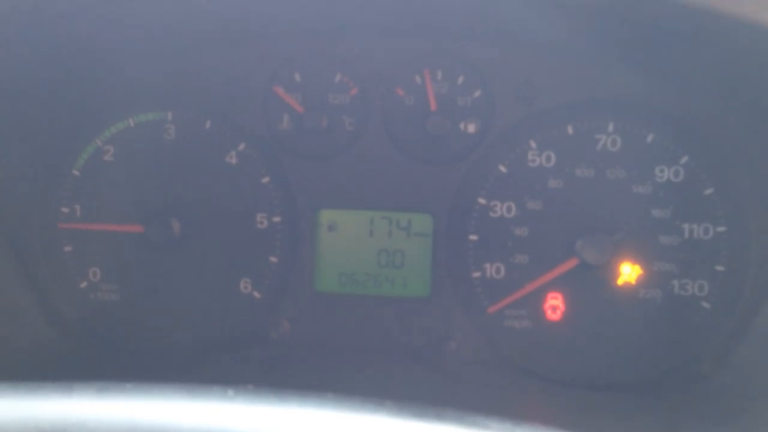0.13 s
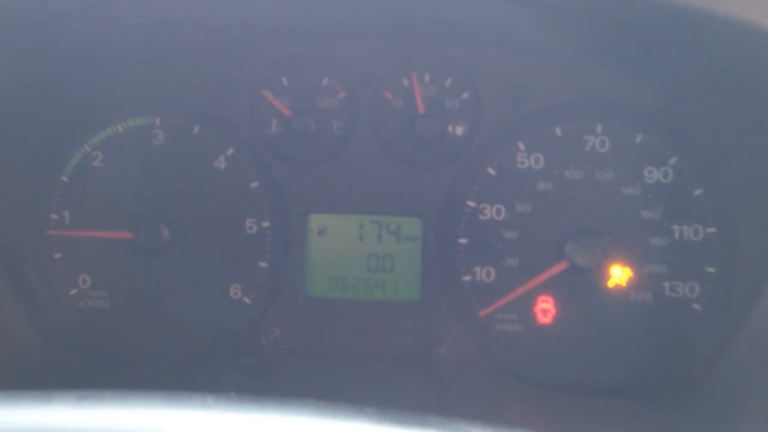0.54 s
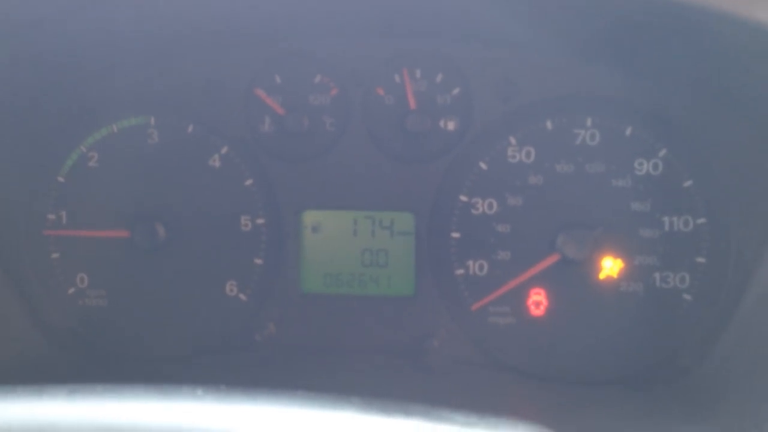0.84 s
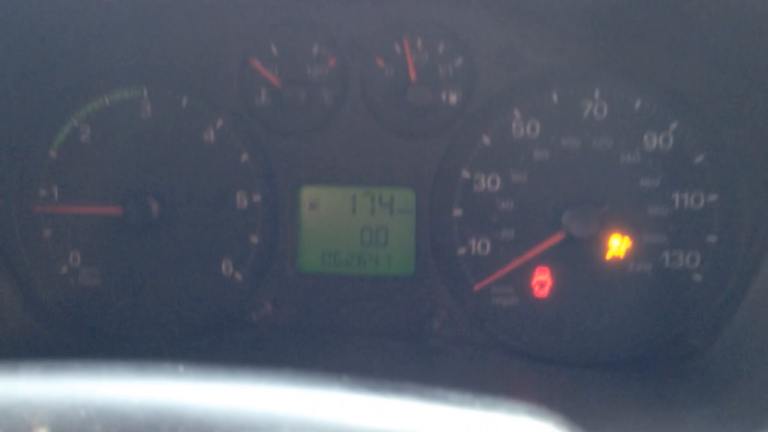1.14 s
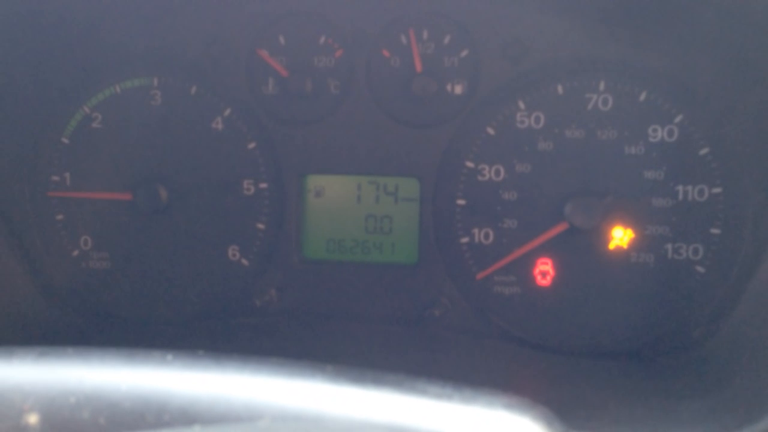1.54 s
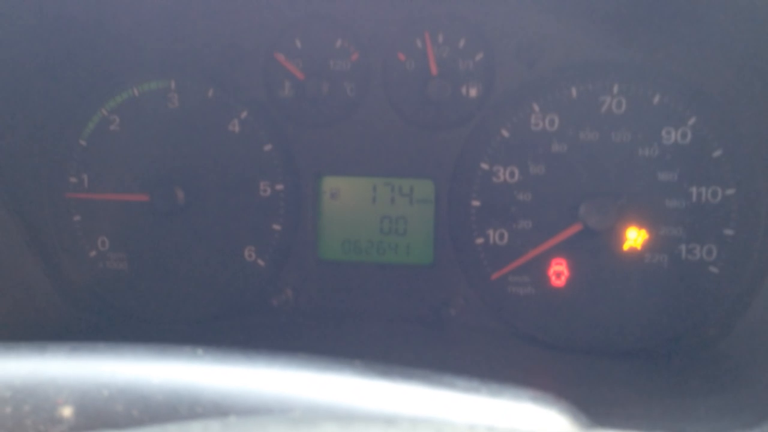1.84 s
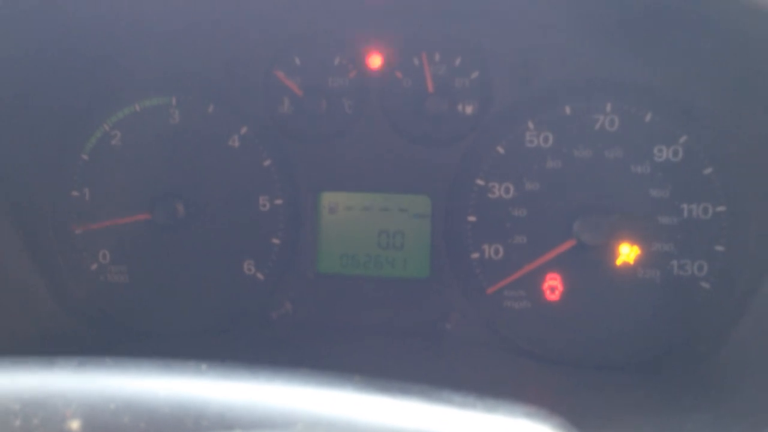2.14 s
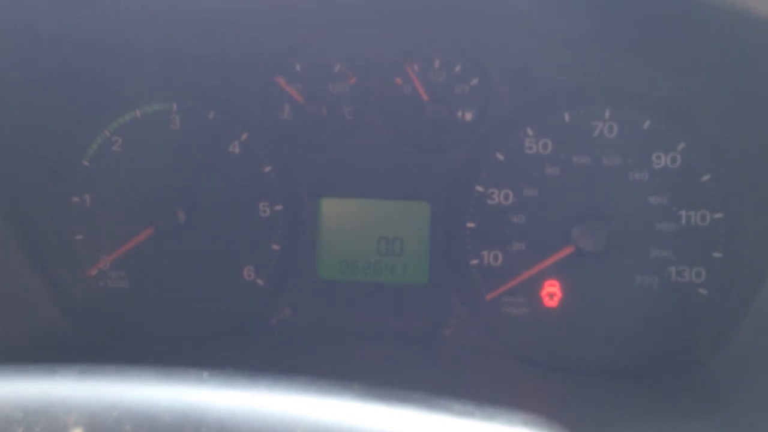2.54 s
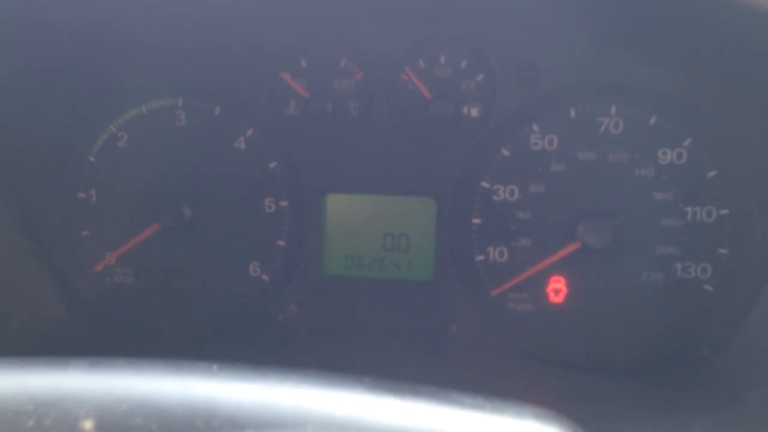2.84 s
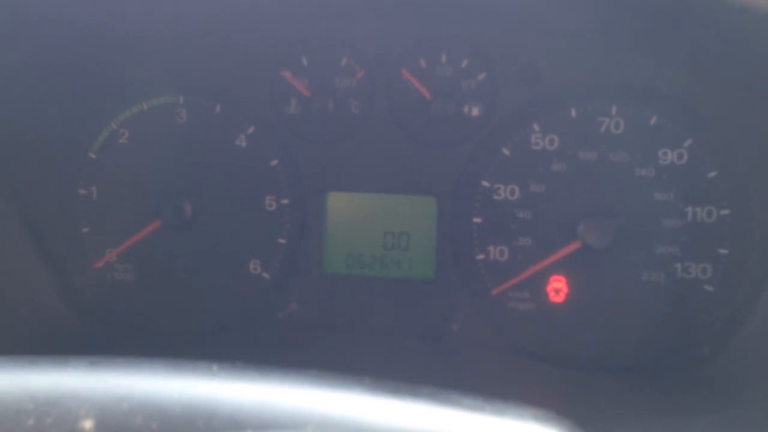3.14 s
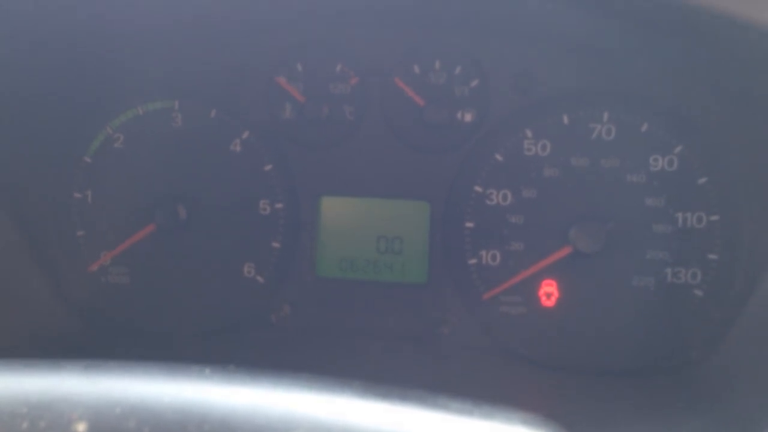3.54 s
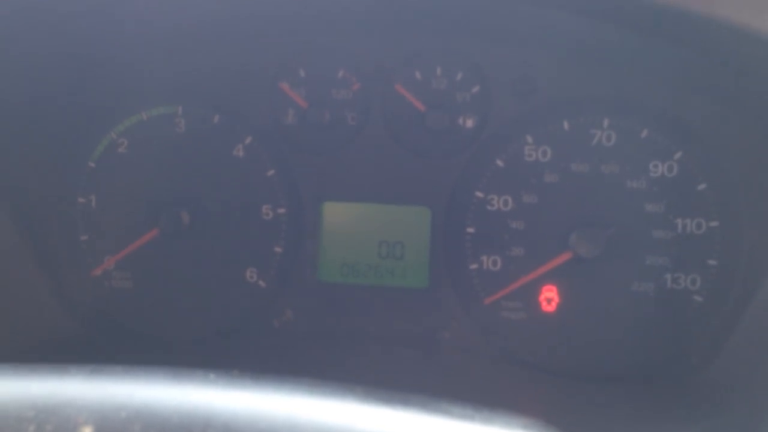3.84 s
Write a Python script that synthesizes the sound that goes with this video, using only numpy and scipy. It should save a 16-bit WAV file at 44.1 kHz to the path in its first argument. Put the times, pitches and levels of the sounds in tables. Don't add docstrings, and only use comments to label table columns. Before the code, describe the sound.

A four-cylinder diesel idles steadily with hum and grainy metallic knocking, heard close inside a van cab; a key clicks, the engine chugs and shudders to rest, then a few faint ticks remain over hiss.

```python
import sys
import numpy as np
from scipy import signal
from scipy.io import wavfile

SR = 44100
rng = np.random.default_rng(int(sys.argv[2]) if len(sys.argv) > 2 else 0)


def output_pcm(signal):
    pcm = np.clip(np.atleast_2d(signal).T, -1, 1) * 32767
    wavfile.write(sys.argv[1], SR, np.round(pcm).astype(np.int16))


def voltage_ratio(decibels):
    exponent = np.asarray(decibels, float) / 20
    return 10 ** exponent


N = 176400
T = np.arange(N) / SR
SLOW_T = T[::16]
CYCLE_S = .15


def rms_one(x):
    return x / np.sqrt(np.mean(x ** 2) + 1e-20)


def in_time(rows):
    s, *columns = np.transpose(rows)
    return [np.interp(T, s, c) for c in columns]


def drift(rate_hz):
    knots = rng.standard_normal(402)
    return np.interp(T * rate_hz, np.arange(402), knots) * 1.2


def bump(offset, width):
    return np.exp(-.5 * (offset / width) ** 2)


def band(x, low_hz, high_hz):
    sos = signal.butter(2, [low_hz, min(high_hz, .48 * SR)], "band", fs=SR, output="sos")
    return signal.sosfilt(sos, x)


def resonance(x, hz, width_hz):
    r = np.exp(-np.pi * width_hz / SR)
    return signal.lfilter([1, 0, -1], [1, -2 * r * np.cos(2 * np.pi * hz / SR), r * r], x + 1e-18)


def bank(spectrum, sources, shape):
    hz, db = np.transpose(spectrum)
    edges = hz[0] * 2 ** np.arange(0, np.log2(hz[-1] / hz[0]), 1 / 3)
    out = 0
    for k, (low, high) in enumerate(zip(edges, edges[1:])):
        mid = np.sqrt(low * high)
        level = voltage_ratio(np.interp(np.log(mid), np.log(hz), db))
        out = out + level * band(sources[k % 2] * shape(mid), low, high)
    return rms_one(out)


def crank():
    # (time [s], speed [share of idle], hum [dB], clatter [dB])
    run_down = [
        (0, 1, 0, 0),
        (2.08, 1, 0, 0),
        (2.2, .76, -6, -1),
        (2.24, .75, -8, -6),
        (2.28, .75, -10, -17),
        (2.48, .7, -18, -24),
        (2.6, .5, -26, -27),
        (2.8, .3, -40, -34),
        (3.0, .1, -60, -45),
        (4, .1, -70, -70),
    ]
    speed, hum_db, clatter_db = in_time(run_down)
    return np.cumsum(speed) / SR / CYCLE_S, hum_db, clatter_db


def hum():
    # (multiple of cycle rate [1], level [dB rms])
    orders = [(4, -44.5), (8, -44.5), (12, -37), (13, -54), (15, -57), (16, -44), (24, -57), (26, -53),
              (36, -56), (18, -60), (22, -62), (28, -63), (32, -57), (33, -60), (35, -58), (37, -57),
              (41, -62), (42, -61), (44, -59), (45, -58), (51, -62), (55, -59), (59, -65), (68, -65)]
    first_fire_s, boom_order, wander_db, slip_rad = .0095, 14, 1.1, .15
    cycles, hum_db, _ = crank()
    angle = 2 * np.pi * (cycles - first_fire_s / CYCLE_S)
    out = 0
    for order, db in orders:
        if order % 4 == 0:
            lag = np.pi / 2 * (order > boom_order)
        else:
            lag = rng.uniform(0, 2 * np.pi)
        level = np.sqrt(2) * voltage_ratio(db + wander_db * drift(21.98))
        out = out + level * np.cos(order * angle - lag + slip_rad * drift(19))
    return voltage_ratio(hum_db) * out


def rattle_grains(cycles):
    repeat_share, grain_db = .5, .7
    size = int(CYCLE_S * SR)
    grains = rng.standard_normal((2, N + size)) * voltage_ratio(grain_db * rng.exponential(1, (2, N + size)))
    fresh = grains[:, :N]
    looped = grains[:, N + (cycles * size).astype(int) % size]
    return rms_one(np.sqrt(1 - repeat_share) * fresh + np.sqrt(repeat_share) * looped)


def contact_pushes(cycles, clatter_db):
    # (time in cycle [s], level over the wash [dB], centre [Hz], width [octaves], decay [s])
    contacts = [(.074, 7, 630, .2, .012), (.146, 5, 950, .6, .03), (.076, 4, 1000, .5, .03),
                (.148, 7, 1690, .08, .05), (.012, 3, 2300, .3, .04), (.001, 3, 4500, .7, .07),
                (.035, 6, 6500, .6, .09), (.08, 4, 3800, .5, .04), (.076, 2, 240, .4, .03),
                (.117, 2, 240, .4, .025), (.01, 1, 240, .4, .03)]
    # (time [s], level against idle clatter [dB], length [s])
    compressions = [
        (2.242, -12.5, 0.033),
        (2.296, -5, 0.051),
        (2.369, -8.5, 0.026),
        (2.397, -10, 0.044),
        (2.469, -10, 0.07),
        (2.588, -23.5, 0.14),
    ]
    rise_s, spread_db = .0012, .8
    spread = rng.standard_normal((len(contacts), 40))
    slow_cycles = cycles[::16]
    pushes = []
    for (s, db, _, _, decay_s), luck in zip(contacts, spread):
        turns = slow_cycles - s / CYCLE_S
        age = turns % 1 * CYCLE_S
        strength = voltage_ratio(db + spread_db * luck[np.floor(turns).astype(int)])
        pushes.append(strength * (1 - np.exp(-age / rise_s)) * np.exp(-age / decay_s))

    hush_s, hush_length_s, hush_db, hush_above_hz = .139, .010, -5, 2500
    from_hush_s = ((slow_cycles - hush_s / CYCLE_S + .5) % 1 - .5) * CYCLE_S
    hush = bump(from_hush_s, hush_length_s)

    chug_s, chug_db, chug_length_s = np.transpose(compressions)
    after = np.maximum(SLOW_T[:, None] - chug_s, 0)
    swell = (1 - np.exp(-after / 0.0017)) / (1 + (after / chug_length_s) ** 6)
    chugs = np.sum(voltage_ratio(chug_db) * swell, axis=1)
    chug_tilt_db = -3

    def shape(at_hz):
        gain = 1
        for push, (_, _, hz, octaves, _) in zip(pushes, contacts):
            gain = gain + push * bump(np.log2(at_hz / hz), octaves)
        gain = gain * voltage_ratio(hush_db * hush / (1 + (hush_above_hz / at_hz) ** 2))
        idle = rms_one(gain) * voltage_ratio(clatter_db[::16])
        return np.interp(T, SLOW_T, idle + chugs * voltage_ratio(chug_tilt_db * np.log2(at_hz / 1000)))
    return shape


def block_rings(cycles, sources, shape):
    # (centre [Hz], width [Hz], level [dB])
    modes = [(622, 24, -54), (1685, 15, -54), (1724, 28, -53), (767, 25, -58.5), (1044, 17, -58.5),
             (222, 18, -65.5), (355, 51, -63.5), (462, 57, -62.5), (929, 16, -60), (1200, 17, -56.5),
             (1421, 25, -60), (2130, 96, -55.5), (2600, 40, -60.5), (3157, 150, -69)]
    # (time in cycle [s], level [dB], pitch struck most [Hz])
    knocks = [(.0005, -2, 1690), (.0088, 0, 1690), (.0171, -2, 1690), (.026, 0, 1690), (.0402, 1, 1690),
              (.080, 3, 1690), (.112, 3, 1690), (.130, 2, 1690), (.148, 2, 630), (.0755, 5, 630),
              (.112, -1, 630), (.147, 1, 766), (.033, 3, 766), (.102, 1, 766), (.010, 3, 930),
              (.083, -1, 930), (.002, -1, 1066), (.012, 0, 1066), (.077, 2, 1066), (.083, 0, 1066),
              (.149, 1, 1200), (.007, -1, 1200), (.034, 1, 1200), (.088, 0, 1200), (.004, 2, 1420),
              (.017, 1, 1420), (.032, 2, 1420), (.093, 0, 1420), (.045, 0, 2120), (.085, 0, 2120),
              (.119, 2, 2120), (.133, 0, 2120), (.099, 0, 2600), (.148, 1, 470), (.080, 3, 470),
              (.118, 3, 470), (.089, 0, 3157), (.114, 0, 3157)]
    # (time [s], level [dB], pitch struck most [Hz])
    last_knocks = [(1.875, 7, 520), (2.25, 10, 2120), (2.259, 14, 1420), (2.3, 11, 1200), (2.302, 9, 1690),
                   (2.304, 15, 930), (2.333, 16, 766), (2.379, 14, 2120), (2.402, 13, 850),
                   (2.476, 15, 930), (2.494, 15, 1400), (2.505, 14, 540)]
    knock_db, jitter_s, knock_octaves = 35, .0001, .07
    s, db, struck_hz = np.transpose(knocks)
    turns = np.arange(15)[:, None] + (s + jitter_s * rng.standard_normal((15, len(s)))) / CYCLE_S
    at = np.interp(turns, cycles, np.arange(N)).astype(int)
    last_s, last_db, last_hz = np.transpose(last_knocks)
    last_at = (last_s * SR).astype(int)
    unfired = voltage_ratio(-9 * (T > 2.035))
    rings = 0
    for k, (hz, width_hz, ring_db) in enumerate(modes):
        drive = sources[k % 2].copy()
        knock = voltage_ratio(knock_db + db + rng.normal(0, 0.35, at.shape))
        drive[at] += knock * bump(np.log2(hz / struck_hz), knock_octaves)
        drive[last_at] += voltage_ratio(knock_db + last_db) * bump(np.log2(hz / last_hz), 2 * knock_octaves)
        drive = band(drive, hz / 2, hz * 2) * shape(hz) * unfired
        rings = rings + voltage_ratio(ring_db) * rms_one(resonance(drive, hz, width_hz))
    return rings


def clatter():
    # (frequency [Hz], level [dB per Hz])
    colour = [(76, -18), (130, -2), (200, 0), (300, -6), (509, -8), (999, -10.5), (1700, -8.5),
              (2300, -11.5), (4130, -16.5), (9000, -38.5), (11700, -60), (19800, -120)]
    cycles, _, clatter_db = crank()
    cycles = cycles + .002 * drift(5)
    sources = rattle_grains(cycles)
    shape = contact_pushes(cycles, clatter_db)
    rings = block_rings(cycles, sources, shape)
    return (voltage_ratio(-42) * bank(colour, sources, shape) + rings) / np.sqrt(2)


def rocking():
    # (time [s], level [dB])
    shudder = [
        (0, -54),
        (2.0, -54),
        (2.3, -44),
        (2.42, -43),
        (2.52, -52),
        (2.64, -43),
        (2.8, -47),
        (3.12, -54),
        (3.22, -62),
        (4, -60),
    ]
    # (frequency [Hz], level [dB per Hz])
    colour = [(20, -8), (60, 5), (150, -0.5), (250, -8.5), (400, -27.5), (600, -16)]
    # (time [s], peak [dB], pitch [Hz], t60 [s])
    rocks = [(2.09, -36, 218, 0.67), (2.138, -40, 46.25, 2.86), (1.8, -49, 56, 0.23),
             (2.363, -36, 106, 0.3), (2.598, -22, 80, 0.064), (3.799, -56, 50, 0.61),
             (2.719, -36, 42, 0.21), (2.98, -50, 40, 0.44), (2.565, -40, 180, 0.32),
             (2.355, -39, 169, 0.13), (2.2, -43, 52, .2), (3.269, -42, 48, 0.19)]
    rumble = bank(colour, rng.standard_normal((2, N)), lambda hz: voltage_ratio(1.6 * drift(15)))
    out = voltage_ratio(in_time(shudder)[0] - 0.5) * rumble
    for s, db, hz, t60_s in rocks:
        age = np.maximum(T - s, 0)
        envelope = voltage_ratio(db + 3.5 - 60 * age / t60_s) * (1 - np.exp(-age * hz / 0.57))
        out = out + envelope * np.sin(2 * np.pi * hz * age)
    return out


def chuffs():
    # (time [s], level [dB])
    swells = [(0, -56), (2.6, -66.5), (2.8, -67.5), (3.05, -75), (3.2, -71.5), (3.27, -61.5), (3.6, -71),
              (3.75, -69), (3.82, -69.5), (3.88, -61.5), (4, -71.5)]
    # (frequency [Hz], level [dB per Hz])
    colour = [(300, -4.5), (1200, -6), (2500, -14), (5000, -17), (8000, -65)]
    noise = rng.standard_normal((2, N))
    rings = rms_one(sum(resonance(noise[0], hz, 18.0) for hz in (950, 1220, 2010)))
    return voltage_ratio(in_time(swells)[0]) * (bank(colour, noise, lambda hz: 1) + voltage_ratio(-8) * rings)


def microphone_hiss():
    # (frequency [Hz], level [dB per Hz])
    colour = [(120, -19.5), (200, 1.5), (477, -20), (572, -7), (836, -23), (3440, -18.5), (4120, -18.5),
              (15200, -22)]
    colour = [*colour, (17000, colour[-1][1])]
    return voltage_ratio(-63) * bank(colour, rng.standard_normal((2, N)), lambda hz: 1)


def brushes():
    # (time [s], level [dB], length [s])
    strokes = [
        (.88, -67.5, .12),
    ]
    swell = sum(voltage_ratio(db) * bump(T - s, length_s) for s, db, length_s in strokes)
    cloth = rms_one(band(rng.standard_normal(N), 8440, 12500))
    return swell * voltage_ratio(2.4 * drift(40.2)) * cloth


def ticks(rows):
    grain_db, snap = 3, 1.5
    out, age = np.zeros(N + SR), np.arange(SR // 6) / SR
    for (s, db, hz, octaves, decay_s), noise in zip(rows, rng.standard_normal((len(rows), len(age)))):
        fade = np.exp(-age / decay_s) + 0.34 * np.exp(-age / (3.2 * decay_s))
        push = noise * voltage_ratio(grain_db * noise[::-1]) * (1 - np.exp(-age / 0.00064)) * fade
        push[SR // 1000] += snap * np.sqrt(SR / hz)
        burst = band(push, hz / 2 ** octaves, hz * 2 ** octaves)
        burst = band(burst, hz / 4.0 ** octaves, hz * 2.1 ** octaves)
        start = int(s * SR)
        out[start:start + len(age)] += voltage_ratio(db + 5) * burst / np.abs(burst).max()
    return out[:N]


def key_turn():
    # (time [s], peak [dB], centre [Hz], width [octaves], decay [s])
    clicks = [(1.838, -48.5, 6460, 0.59, 0.0092), (2.014, -39, 8000, 1, 0.0083),
              (2.0240, -20, 12300, 0.25, 0.0024), (2.0250, -24.5, 4400, 0.23, 0.0043),
              (2.0245, -26.5, 7460, 0.26, 0.0039), (2.029, -27.5, 2600, 0.49, .006),
              (2.031, -28.5, 645, 0.33, 0.0024), (2.032, -33, 396, 0.39, 0.012),
              (2.0975, -30, 3070, 0.96, 0.0045), (2.098, -42, 9000, .7, 0.006),
              (2.1745, -36, 3320, 0.23, 0.0067), (2.1745, -34.5, 7300, 0.27, 0.0047),
              (2.1745, -41, 12500, .3, 0.0032), (2.179, -36, 9000, .7, 0.0045),
              (2.1855, -29, 3120, 0.13, 0.0045), (2.186, -27.5, 5040, 0.37, .005),
              (2.1855, -30, 7770, 0.062, 0.0025), (2.187, -24.5, 1490, 1.79, 0.0083),
              (2.2, -37, 3500, 0.75, 0.0053), (2.222, -45, 3000, 0.48, 0.0092)]
    return ticks(clicks)


def trim_ticks():
    # (time [s], peak [dB], centre [Hz], width [octaves], decay [s])
    knocks = [(2.632, -41, 254, 0.5, 0.02), (3.031, -58, 2950, 0.37, 0.0062),
              (3.4995, -53, 5000, 1.0, .004), (3.5035, -42, 1580, 1.13, 0.0038),
              (3.506, -46.5, 460, .5, 0.018), (3.526, -45, 3100, 0.6, 0.011),
              (3.5275, -45.5, 1200, 0.62, 0.01), (3.529, -36, 417, 0.41, 0.0075),
              (3.545, -49, 446, 0.55, 0.0055), (3.562, -46, 505, 0.81, 0.01),
              (3.567, -52, 2040, 0.4, 0.0045), (3.6685, -40.5, 790, 0.24, 0.0043),
              (3.6705, -36, 470, 0.54, .006), (3.669, -49.5, 1580, 0.45, 0.011),
              (3.669, -57, 3500, 0.36, .002)]
    return ticks(knocks)


def scene():
    engine = hum() + clatter() + rocking() + chuffs()
    cab = microphone_hiss() + brushes() + key_turn() + trim_ticks()
    return (engine + cab)[None]


def top_cut(x):
    return signal.sosfilt(signal.butter(12, 15320, fs=SR, output="sos"), x)


def record(dry):
    low_pass = signal.cheby2(12, 50, 15600, fs=SR, output="sos")
    mix = signal.sosfilt(low_pass, dry)
    return top_cut(mix)


dry = scene()
out = record(dry)
output_pcm(out)
```